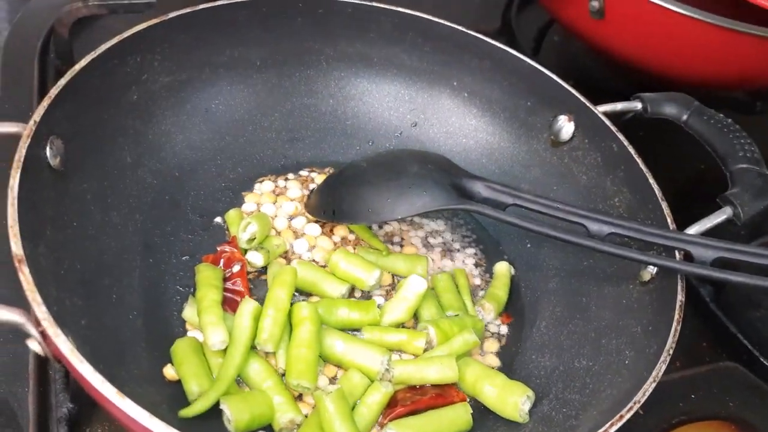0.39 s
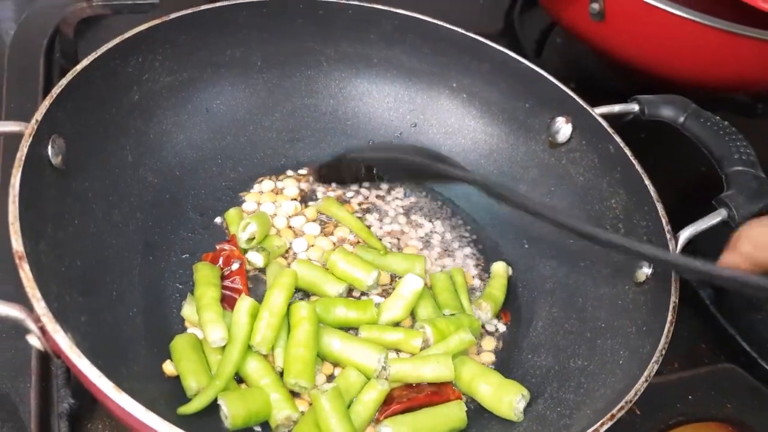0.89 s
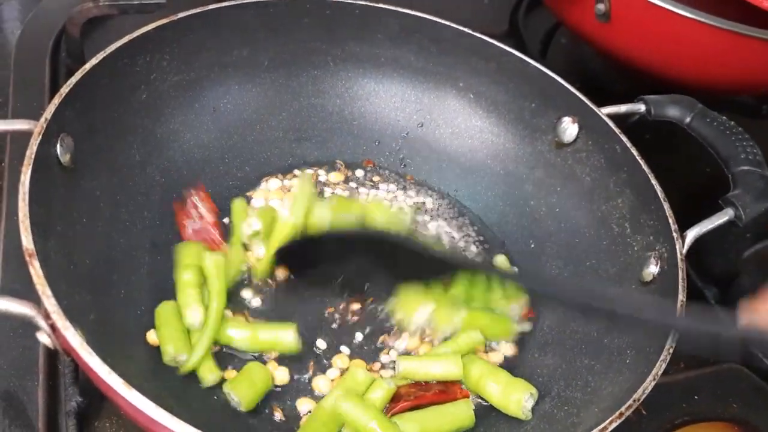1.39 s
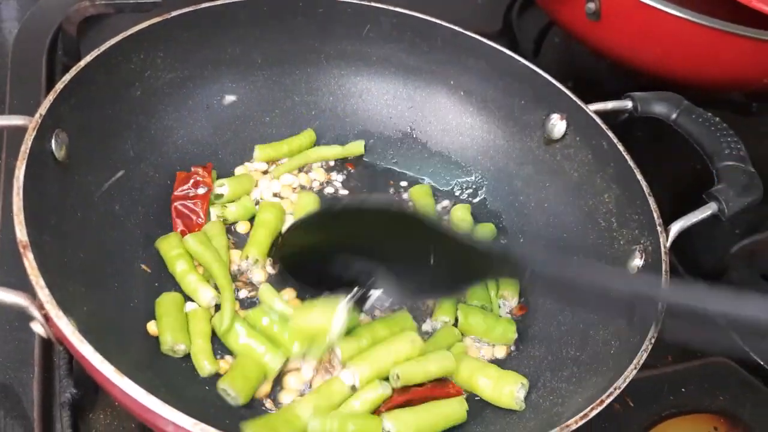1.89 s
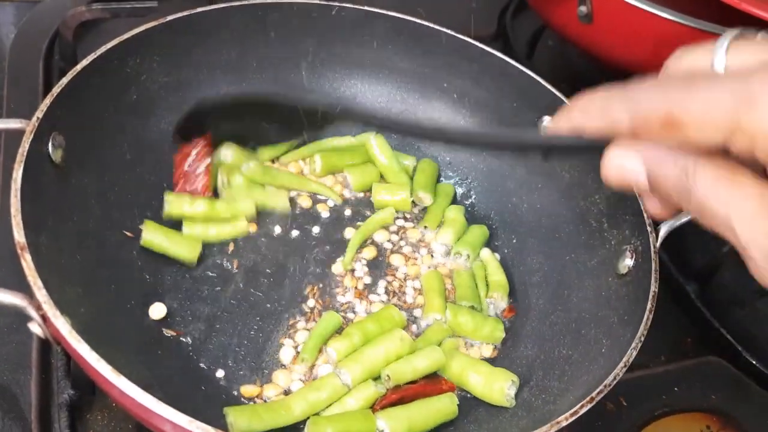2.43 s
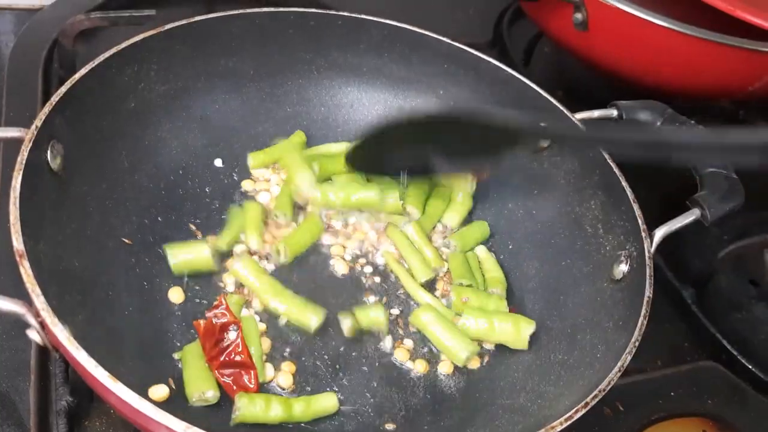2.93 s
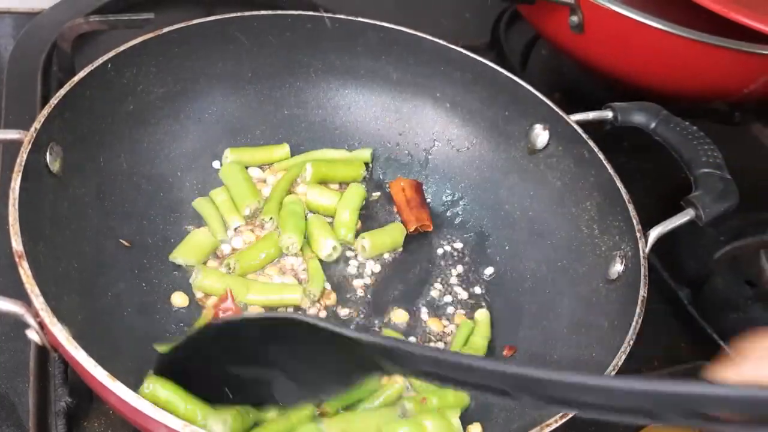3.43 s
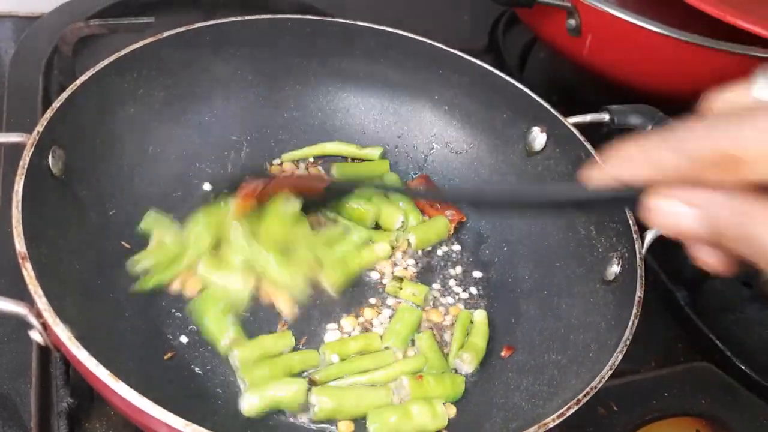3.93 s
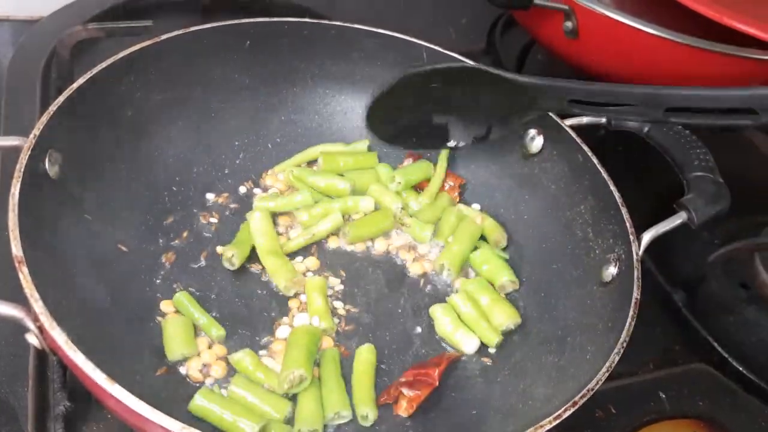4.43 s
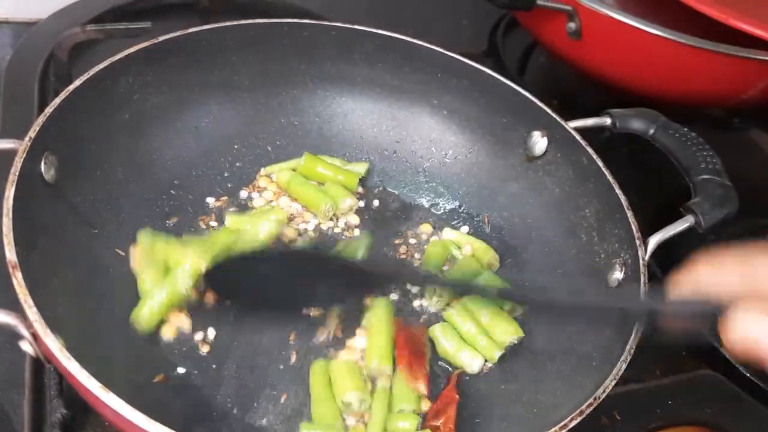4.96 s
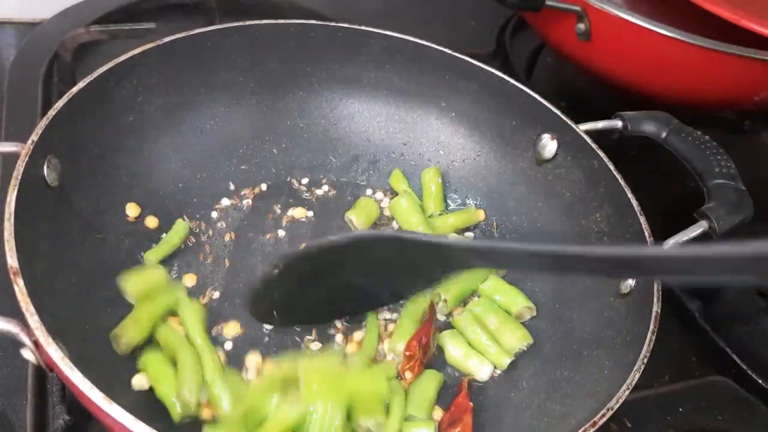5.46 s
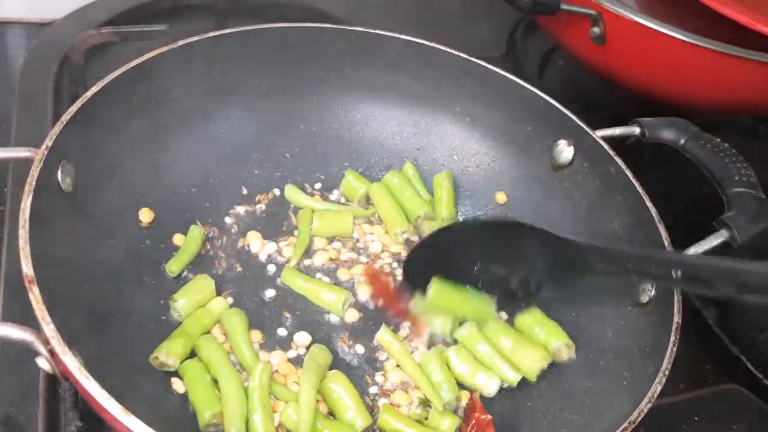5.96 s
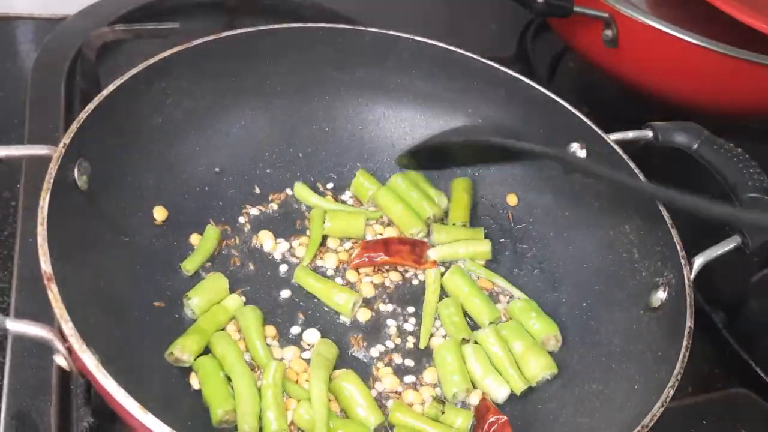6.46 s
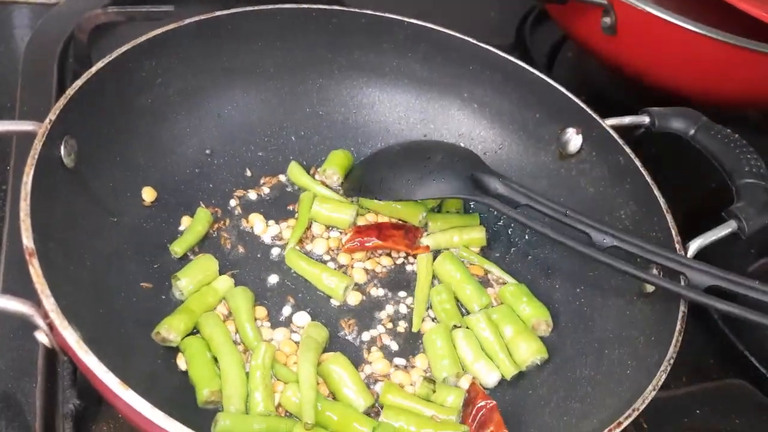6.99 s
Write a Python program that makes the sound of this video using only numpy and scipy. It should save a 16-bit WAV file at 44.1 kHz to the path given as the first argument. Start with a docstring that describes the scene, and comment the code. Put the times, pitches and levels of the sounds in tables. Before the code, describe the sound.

Green chillies, seeds and lentils sizzle brightly in hot oil, with sharp crackles, while a spatula scrapes and dully knocks the pan in quick strokes.

```python
"""A dense bright hiss of steam bubbles, with louder crackles: green chillies, seeds and lentils fry in hot oil.
The hiss is noise and random clicks in wide resonances; crackles are short snaps with a spit of noise.
A spatula scrapes and knocks the steel pan, whose damped modes ring dully; chillies tumble and thud softly.
A low boom swells now and then, perhaps the pan rocking on the stove: noise in narrow low resonances.
At moments the whole sound thins for an instant to a few bright tones. The microphone is close and mono."""
import sys
import numpy as np
from scipy import signal
from scipy.fft import rfft, irfft
from scipy.io import wavfile
from scipy.ndimage import uniform_filter1d

SR = 44100
rng = np.random.default_rng(int(sys.argv[2]) if len(sys.argv) > 2 else 0)


def field_ratio(decibels):
    """Amplitude ratio for a level in dB (20 dB per decade); scalars and array-likes work."""
    return 10 ** (np.asarray(decibels, dtype=float) / 20)


def wrap_up_sound(samples):
    """Save the sound to the file named by the first command line argument, as 16-bit audio."""
    columns = np.atleast_2d(samples).T
    # keep every value between -1 and 1, then stretch to whole-number steps
    tamed = np.clip(columns, -1, 1)
    steps = np.round(tamed * 32767).astype(np.int16)
    wavfile.write(sys.argv[1], SR, steps)


N = 313551  # samples

# Spatula strokes. Each row: middle in seconds, length in seconds, scrape level in dB,
# level of the tumbling chillies in dB.
STROKES = [(0.35, 0.18, -53, -63), (0.58, 0.17, -43, -49.5), (0.814, 0.22, -40.5, -55),
           (0.974, 0.23, -36.5, -50.5), (1.25, 0.35, -38.5, -57), (1.5, 0.29, -34, -51),
           (1.756, 0.34, -32.5, -49), (1.9, 0.29, -34, -50), (2.097, 0.35, -35.5, -47),
           (2.33, 0.44, -34.5, -48.5), (2.57, 0.25, -32, -45), (2.774, 0.21, -30.5, -45.5),
           (2.95, 0.29, -34.5, -48.5), (3.204, 0.19, -32, -53), (3.368, 0.25, -36, -47),
           (3.513, 0.25, -32, -48.5), (3.668, 0.25, -33, -58), (3.834, 0.27, -33, -51),
           (4.036, 0.36, -31, -50), (4.325, 0.41, -35, -52.5), (4.676, 0.3, -35, -51.5),
           (4.958, 0.26, -34.5, -50), (5.154, 0.23, -35, -58), (5.367, 0.22, -33.5, -54),
           (5.73, .25, -36.5, -54), (6.1, 0.48, -42.5, -58.5), (6.316, 0.22, -38, -69),
           (6.48, 0.17, -40, -71), (6.64, 0.33, -39, -51), (7.046, 0.24, -41.5, -56)]


def level(x, db):
    """Scale to an rms level."""
    return x * field_ratio(db) / np.sqrt(np.mean(x ** 2))


def colour(x, points):
    """Minimum-phase filter through (Hz, dB) points, from a folded cepstrum."""
    point_hz, db = np.transpose(points)
    bin_hz = np.arange(513) * SR / 1024
    log_gain = np.interp(np.log(bin_hz + 1), np.log(point_hz), db) * np.log(10) / 20
    cepstrum = irfft(log_gain)
    cepstrum[1:512] *= 2
    cepstrum[513:] = 0
    impulse = irfft(np.exp(rfft(cepstrum)))
    return signal.fftconvolve(x, impulse)[:len(x)]


def band(x, hz, width_hz):
    """Two-pole resonance, gain 1 at the centre."""
    return signal.lfilter(*signal.iirpeak(hz, hz / width_hz, fs=SR), x)


def ring(x, hz, t60_s):
    """One decaying mode; it radiates by its speed, so it passes no bass."""
    radius = np.exp(-np.log(1000) / (t60_s * SR))
    w = 2 * np.pi * hz / SR
    mode = signal.lfilter([1, 0, -1], [1, -2 * radius * np.cos(w), radius * radius], x)
    return mode / (2 * np.sin(w / 2) + 1)


def walk(rate_hz):
    """Random levels held 1 / rate_hz seconds and slewed twice."""
    hold = int(SR / rate_hz)
    steps = np.repeat(rng.standard_normal(N // hold + 1), hold)
    return uniform_filter1d(uniform_filter1d(steps, hold), hold)[:N]


def grains(per_s, spread_db, top_db):
    """Random clicks of either sign, most small and a few large."""
    when, size, sign = rng.random((3, N))
    size_db = np.minimum(-spread_db * np.log(size + 1e-9), top_db)
    return (when < per_s / SR) * field_ratio(size_db) * np.sign(sign - .5)


def resonances(table, db):
    """Noise in a few narrow resonances (Hz, width Hz, dB), each wavering alone."""
    total = 0
    for hz, width_hz, gain_db in table:
        noise = band(band(rng.standard_normal(N), hz, width_hz), hz, 3 * width_hz)
        total = total + field_ratio(gain_db + 2.5 * walk(11)) * noise / np.sqrt(width_hz)
    return level(total, 0) * field_ratio(db)


def swells(middle_s, length_s, db, rest_db):
    """Gain of smooth rises and falls whose powers add over a resting level."""
    t = np.arange(N) / SR
    power = np.full(N, field_ratio(rest_db) ** 2)
    for middle, length, peak_db in zip(middle_s, length_s, db):
        phase = np.clip((t - middle) / length, -.5, .5)
        power = power + field_ratio(peak_db) ** 2 * np.cos(np.pi * phase) ** 2
    return np.sqrt(power)


def sizzle():
    """Bubbles of every size burst at the oil surface, each ringing a few cycles and leaving a puff of spray."""
    # Sizzle strength as stirring turns wet food into the oil. Each row: time in seconds, level in dB.
    strength = [(0.0, -31), (0.3, -32.5), (0.6, -28.5), (0.75, -30), (1.04, -28), (1.34, -28.5),
                (1.45, -23.5), (1.62, -25), (1.92, -21.5), (2.06, -23.5), (2.24, -19.5), (2.6, -22),
                (2.8, -23), (2.97, -21.5), (3.22, -22), (3.5, -20.5), (3.85, -21.5), (4.32, -19),
                (4.53, -25), (4.63, -21.5), (4.93, -24), (5.12, -20.5), (5.28, -24), (5.5, -21.5),
                (5.6, -22.5), (5.78, -21.5), (5.95, -23), (6.45, -24.5), (7.11, -27)]
    # Spectral tilt of the frying. Each row: frequency in Hz, gain in dB.
    fizz = [(100, -25.5), (300, -33), (700, -16), (1050, -10), (1300, -9), (2600, -10.5), (3700, -12),
            (4900, -10), (5800, -4.5), (6800, -3.5), (8500, -1.5), (9400, -3.5), (12200, -2.5),
            (14400, -5.5), (15700, -12)]
    out = level(rng.standard_normal(N), -4.0) * field_ratio(2.0 * walk(90))
    out = out + level(grains(per_s=240, spread_db=4.0, top_db=7.5), -12)  # droplets snap across all pitches
    for hz in (2870, 4380, 6300, 8200, 10600, 12610):
        pops = grains(per_s=500, spread_db=2.0, top_db=6.5)
        puff_power = signal.lfilter([1], [1, -np.exp(-1 / (0.01 * SR))], pops ** 2)
        puff = np.sqrt(puff_power) * rng.standard_normal(N)
        burst = level(pops, -1.7) + level(puff, -3.0)
        out = out + level(band(burst, hz, 0.32 * hz), -8.0) * field_ratio(1.2 * walk(40))
    out = colour(out * field_ratio(.5 * walk(30)), fizz)
    return level(out, 0) * field_ratio(np.interp(np.arange(N) / SR, *np.transpose(strength)))


def crackles():
    """Bursting seeds and spits of oil: a snap of a few cycles and a decaying spit of noise."""
    # Each row: start in seconds, snap peak in dB, centre in Hz, spit level re the snap peak in dB.
    bursts = [(0.0523, -14, 8300, -10), (0.063, -21, 9200, -0.5), (0.2747, -16, 8600, -9.5),
              (0.3625, -13, 6300, -14), (0.561, -6.5, 6950, -11), (0.5656, -12, 9900, -14),
              (0.5706, -11, 10100, -9), (0.5765, -7, 8700, -12), (0.6358, -18, 9000, -10),
              (0.6449, -16, 10800, -5), (0.9353, -18, 8300, -6), (0.9806, -17, 9100, -14),
              (1.044, -10, 8200, -8.5), (1.054, -10, 9800, -14), (1.1209, -2, 8000, -14.5),
              (1.1262, -11, 9100, -14), (1.1304, -8, 9000, -14), (1.1656, -10, 8600, -14),
              (1.2992, -8, 9000, -20), (1.3037, -10, 9900, -16), (1.3227, -14, 8200, -9),
              (1.349, -16, 7240, -14), (1.4024, -8.5, 8300, -12.5), (1.586, -10, 9300, -7.5),
              (1.6557, -11, 7100, -10), (1.8632, -4, 8100, -24), (1.914, -4, 8800, -14),
              (2.1397, -9, 8500, -17), (2.281, -7, 9300, -18), (2.538, -6, 8550, -11.5),
              (2.556, -4, 8550, -14), (3.4787, -10.5, 10900, -6), (3.707, -4.5, 9200, -16),
              (3.7684, -3.5, 9100, -13.5), (3.849, -7, 8000, -16), (3.8722, -5, 8000, -15),
              (4.1351, -4, 7960, -19), (4.4303, -5, 8900, -13), (5.0727, -6, 9600, -14),
              (5.0814, -6, 10200, -12), (5.381, -6, 9200, -15), (5.681, -3.5, 7660, -21),
              (6.2066, -4, 9000, -19), (6.8099, -8.5, 7900, -12)]
    snap_decay_s, spit_t60_s = 0.00024, 0.032
    out, t = np.zeros(N + 4096), np.arange(4096) / SR
    for start_s, peak_db, hz, spit_db in bursts:
        snap_noise, spit_noise = rng.standard_normal((2, 4096))
        width_hz = 0.67 * hz
        snap = band(band(snap_noise * np.exp(-t / snap_decay_s), hz, width_hz), hz, width_hz)
        spit = band(band(spit_noise, hz, width_hz), hz, width_hz)
        spit = spit * np.exp(-np.log(1000) * t / spit_t60_s)
        crackle = snap / np.abs(snap).max() + field_ratio(spit_db) * spit / spit[:64].std()
        out[int(start_s * SR):][:4096] += field_ratio(peak_db) * crackle
    return out[:N]


def pan():
    """Seeds rattle under the spatula edge; knocks are short rough pushes; both ring the same modes."""
    # Pan modes. Each row: frequency in Hz, gain in dB, t60 in seconds.
    modes = [(683, -9, 0.037), (781.5, -10, 0.15), (829, -4.5, 0.098), (890.7, 3.5, 0.045),
             (1164, -1, 0.038), (1325, 1.5, 0.016), (1480, 3.5, 0.031), (1792, 4.5, 0.024),
             (2136, 12.5, 0.015), (2373, 14, 0.0091), (2740, 12.5, 0.014), (3205, 10.5, 0.012)]
    # Spatula knocks. Each row: start in seconds, peak in dB, favoured frequency in Hz, focus in dB per octave.
    knocks = [(0.32, -30, 829, 6), (0.523, -22, 1490, 8), (0.56, -16, 860, 3), (0.577, -22.5, 3160, 22),
              (0.952, -15.5, 867, 3.5), (1.249, -25, 2280, 2), (1.276, -21.5, 1050, 12),
              (1.444, -24, 910, 25), (1.464, -25, 2260, 8), (1.494, -21.5, 834, 0), (1.654, -25, 3080, 18),
              (1.752, -19.5, 2680, 9), (1.808, -21, 900, 11.5), (2.047, -14.5, 2140, 1),
              (2.315, -21.5, 3180, 23), (2.758, -15, 2770, 13), (2.962, -18, 2300, 20),
              (3.346, -14, 883, 2), (3.432, -19, 2810, 2), (3.484, -18, 2150, 10), (3.767, -20, 2190, 10),
              (3.848, -20, 824, 1), (4.159, -18, 2970, 20), (4.29, -18.5, 840, 5.5), (4.57, -18, 2950, 3),
              (4.847, -18, 2740, 4.5), (4.917, -14, 2200, 4), (5.391, -24, 2210, 1), (5.482, -22, 1490, 9),
              (5.689, -23, 2750, 6), (5.734, -22.5, 2270, 21), (5.792, -21.5, 3150, 8),
              (5.981, -23, 2480, 17), (6.015, -25, 2170, 20), (6.529, -30, 773, 20), (6.69, -22, 2110, -2),
              (6.903, -30.5, 1470, 29)]
    contact_decay_s = 0.0058
    rub = level(grains(per_s=350, spread_db=1.0, top_db=7.0), -3.2) + level(rng.standard_normal(N), -2.5)
    rub = rub * field_ratio(4.3 * walk(45))  # the edge catches and slips
    scrape = 0
    for k, (hz, gain_db, t60_s) in enumerate(modes):
        scrape = scrape + (-1) ** k * field_ratio(gain_db + 3.34 * walk(24)) * ring(rub, hz, t60_s)
    middle_s, length_s, scrape_db, _ = np.transpose(STROKES)
    out = level(scrape, 0) * swells(middle_s, length_s, scrape_db, rest_db=-44)

    t = np.arange(4096) / SR
    for start_s, peak_db, spot_hz, focus in knocks:
        push = rng.standard_normal(4096) * np.exp(-t / contact_decay_s)
        push[0] = 3.7
        knock = 0
        for k, (hz, gain_db, t60_s) in enumerate(modes):
            # each spot on the pan favours the modes near its own pitch
            spot_db = gain_db - focus * abs(np.log2(hz / spot_hz))
            knock = knock + (-1) ** k * field_ratio(spot_db) * ring(push, hz, t60_s)
        start = int(start_s * SR)
        out[start:start + 4096] += (field_ratio(peak_db) * knock / np.abs(knock).max())[:N - start]
    return out


def tumble():
    """Chillies roll over the pan bottom: low resonant noise swelling with the strokes."""
    # Each row: centre in Hz, width in Hz, relative gain in dB.
    rolling = [(219, 120, 0), (303.4, 20, -5.5), (433, 102, 4), (589.6, 37, 1.5)]
    middle_s, length_s, _, tumble_db = np.transpose(STROKES)
    return resonances(rolling, 0) * swells(middle_s, length_s, tumble_db, rest_db=-60.5)


def thuds():
    """Chillies drop back: each thud is one dull decaying mode with a soft onset."""
    # Each row: start in seconds, level before onset and decay in dB, frequency in Hz, t60 in seconds.
    drops = [(1.758, -30, 571, 0.089), (1.806, -36, 570, 0.12), (2.046, -40, 452, 0.12),
             (2.534, -35, 527, 0.21), (2.598, -37, 417, 0.13), (3.499, -37, 301, 0.27),
             (3.971, -31, 567, 0.083), (4.294, -42, 606, 0.1), (4.939, -38, 565, 0.13),
             (6.679, -44, 428, 0.12), (6.73, -41, 590, 0.11)]
    onset_s = 0.0038
    t, out = np.arange(N) / SR, np.zeros(N)
    for start_s, db, hz, t60_s in drops:
        since_s = np.maximum(t - start_s, 0)
        envelope = (1 - np.exp(-since_s / onset_s)) * np.exp(-np.log(1000) * since_s / t60_s)
        out = out + field_ratio(db) * np.sin(2 * np.pi * hz * since_s) * envelope
    return out


def low_boom():
    """A low boom, perhaps the pan rocking on the stove: wavering low noise resonances that swell now and then."""
    # Each row: centre in Hz, width in Hz, relative gain in dB.
    boom = [(70.5, 20, -3), (99.4, 19, 2), (40, 30, -38.5), (175, 230, -16)]
    # Each row: middle in seconds, length in seconds, level in dB.
    boom_swells = [(0.1, 0.57, -53.5), (0.637, .15, -54), (0.84, .25, -59), (1.007, 0.29, -47.5),
                   (1.393, 0.27, -46), (1.82, .2, -53), (2.002, 0.13, -54), (2.394, 0.49, -59.5),
                   (2.843, 0.31, -44), (3.84, .18, -50), (4.0, 0.13, -53), (4.18, .2, -54),
                   (4.4, 0.17, -55), (4.562, 0.14, -54), (4.82, .3, -55), (5.042, .22, -46),
                   (5.42, 0.18, -57), (5.743, 0.46, -54), (6.06, .3, -56), (6.397, 0.41, -55),
                   (7.082, 0.14, -62)]
    return resonances(boom, 0) * swells(*np.transpose(boom_swells), rest_db=-62)


def scene():
    """One microphone: both channels alike."""
    oil = sizzle() + crackles()
    food = tumble() + thuds()
    mono = oil + pan() + food + low_boom()
    return np.array([mono, mono])


def thin(x, count=12):
    """For an instant all drops away but the strongest treble lines and one low tone, held at fixed pitches."""
    # Each row: middle in seconds, length in ms, rms of the tones in dB, lowest tone in Hz.
    gaps = [(0.4127, 39, -26.5, 5920), (0.4862, 18.5, -37, 2260), (0.5937, 11.3, -24, 7670),
            (0.762, 16, -32.5, 4000), (0.8068, 6.3, -36.5, 828), (1.213, 10, -31.5, 1470),
            (1.3816, 16, -30.5, 860), (1.618, 12, -28.5, 3270), (1.744, 16, -28.5, 5660),
            (1.957, 16, -24.5, 2400), (2.2996, 16, -21.5, 6160), (2.395, 35, -25, 3450),
            (2.461, 35, -25, 837), (2.6418, 14, -17.5, 5540), (2.715, 33, -24, 1780),
            (3.0772, 34.6, -23, 5870), (3.665, 9.3, -23, 2380), (3.7503, 15, -24.5, 4340),
            (4.477, 32, -48, 1070), (4.541, 9.6, -27.5, 4530), (4.658, 36, -26, 843),
            (4.7507, 18.6, -27.5, 4450), (5.199, 18, -25.5, 2700), (5.3382, 36.6, -24.5, 820),
            (5.5209, 12.4, -22, 6300), (5.6073, 19, -24.5, 5800), (5.893, 38, -25, 1750),
            (5.9455, 17, -25, 7540), (6.0535, 17, -24.5, 5800), (6.3311, 18, -24, 6010),
            (6.5458, 15, -25.5, 820), (6.5872, 18, -23.5, 6100), (6.9297, 18, -31, 3320),
            (7.0776, 16, -32, 1507)]
    base_depth_db, knee_ms, extra_db_per_ms = -19.5, 21, -5  # longer gaps sink deeper
    low_tone_db_per_ms = -0.263  # lowest tone re the strongest
    out, t = x.copy(), np.arange(-1536, 1536) / SR
    for middle_s, ms, tones_db, low_hz in gaps:
        depth_db = base_depth_db + extra_db_per_ms * max(ms - knee_ms, 0)
        middle = int(middle_s * SR)
        part = slice(middle - 1536, middle + 1536)
        lines = rfft(x[part][1024:2048] * np.hanning(1024))
        hz = np.arange(len(lines)) * SR / 1024
        size = np.abs(lines) * (hz > max(low_hz, 5400))
        peaks = signal.find_peaks(size, distance=6)[0]
        peaks = peaks[np.argsort(-size[peaks])[:count]]
        peaks[-1] = round(low_hz * 1024 / SR)  # the low tone takes the weakest place
        size[peaks[-1]] = field_ratio(low_tone_db_per_ms * ms) * size.max()

        offset_s = 0.0096 * rng.standard_normal((count, 1))
        swell = np.cos(np.pi / 2 * np.clip((t - offset_s) / 0.022, -1, 1))
        phase = 2 * np.pi * hz[peaks, None] * t + np.angle(lines[peaks, None])
        tones = (size[peaks, None] * swell * np.cos(phase)).sum(0)
        held = np.sin(np.pi / 2 * np.clip(.5 + (.021 - np.abs(t)) / 0.013, 0, 1))
        tones = tones * field_ratio(tones_db) / tones[1280:1792].std() * held

        fade_s = min(ms, 18) / 1000
        gap = np.sin(np.pi / 2 * np.clip(.5 + (ms / 2000 - np.abs(t)) / fade_s, 0, 1)) ** 2
        duck = 1 - (1 - field_ratio(depth_db)) * gap
        n = len(out[part])
        out[part] = out[part] * duck[:n] + tones[:n]
    return out


def top_cut(x):
    """Nothing passes above the cut-off."""
    return signal.sosfilt(signal.butter(12, 15790, fs=SR, output="sos"), x)


def record(dry):
    """Brief thinning, then a steep low-pass at 15.75 kHz."""
    low_pass = signal.ellip(10, .3, 70, 15750, fs=SR, output="sos")
    mono = signal.sosfilt(low_pass, thin(dry[0]))
    return top_cut(np.array([mono, mono]))


dry = scene()
out = record(dry)
wrap_up_sound(out)
```